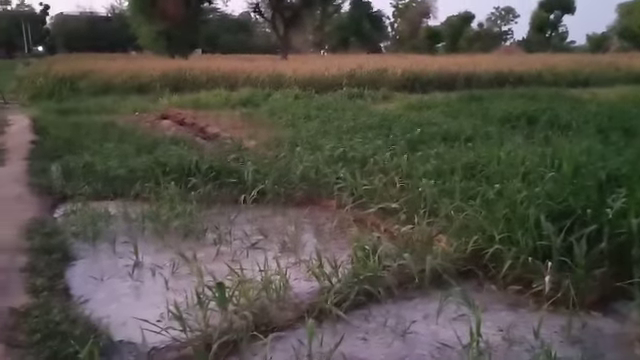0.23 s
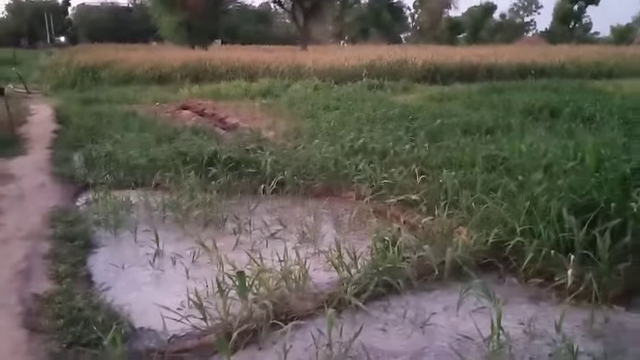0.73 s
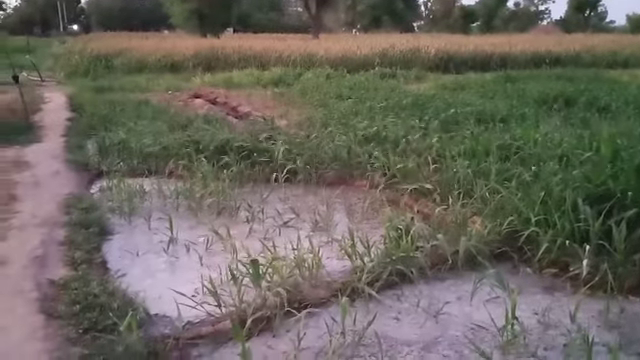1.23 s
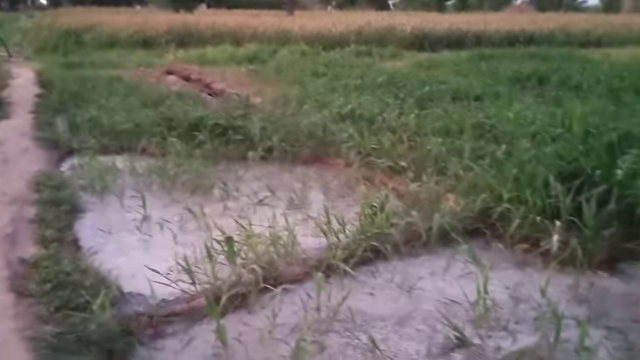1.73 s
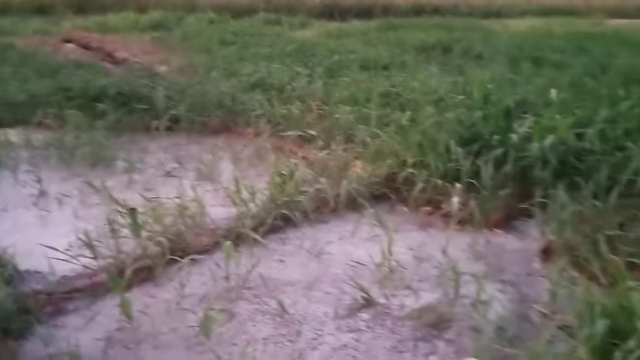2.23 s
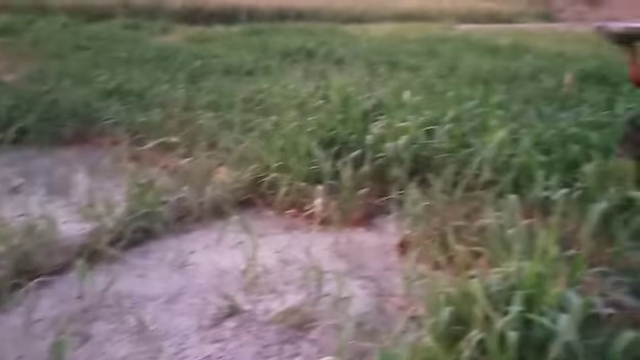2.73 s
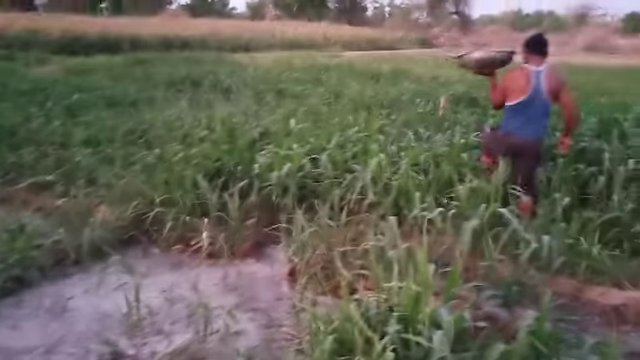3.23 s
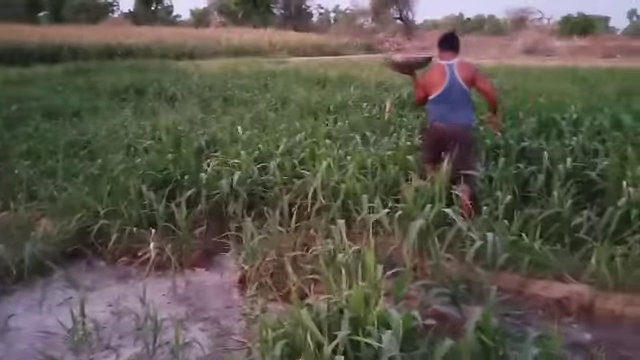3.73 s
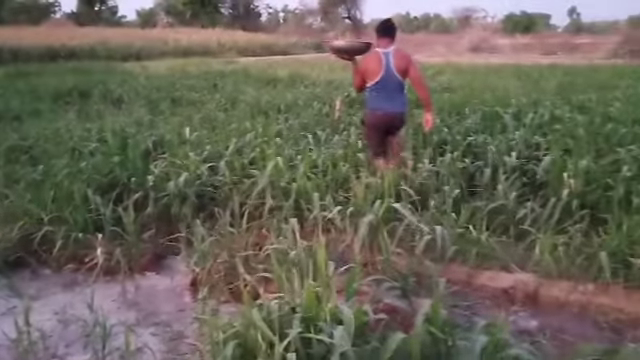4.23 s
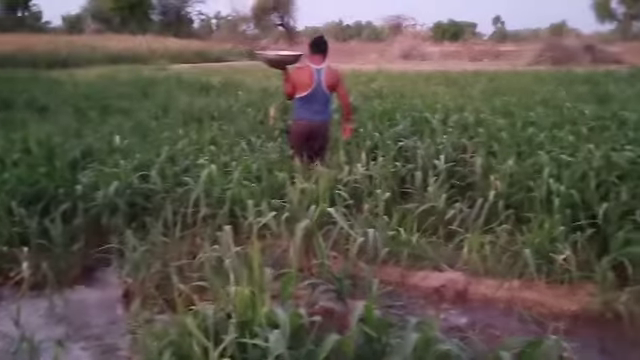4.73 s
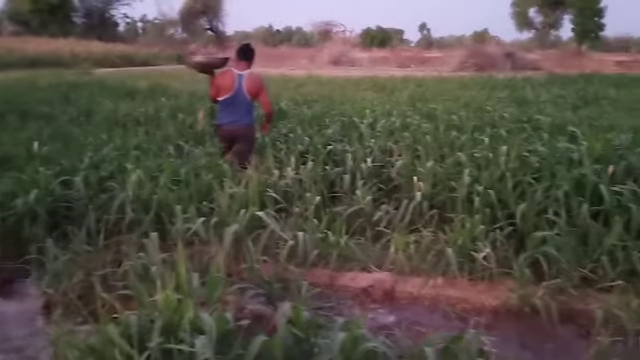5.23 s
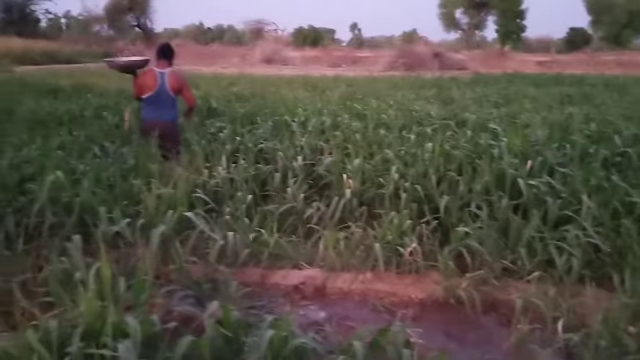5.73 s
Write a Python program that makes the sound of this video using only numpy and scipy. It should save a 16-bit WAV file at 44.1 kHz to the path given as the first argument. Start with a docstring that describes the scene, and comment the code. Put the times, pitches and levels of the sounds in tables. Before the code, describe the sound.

A lively dawn chorus and high cicada buzz fill a field while wind bumps the microphone, leaves rustle and wet footfalls pop.

```python
"""Small birds chirp over a farm field at dawn, doves coo and one far bird whistles in arcs. Cicadas drone high
above them, leaves swish, mud squelches as someone wades past, and wind buffets mostly the right port of a
stereo microphone. Bird notes are gliding sine tones with a tail of noise echoes from the trees; insects are
clicks and noise through resonances; leaves and mud are shaped noise, with short bursts for snaps and pops;
wind is short low swings of pressure over rumble, and a soft hiss lies under everything."""
import sys
import numpy as np
from scipy import signal
from scipy.fft import rfft, irfft, next_fast_len
from scipy.io import wavfile

SR = 44100
rng = np.random.default_rng(int(sys.argv[2]) if len(sys.argv) > 2 else 0)


def generate_wav(signal):
    """Clip the signal to [-1, 1] and save it as 16-bit WAV at the path in sys.argv[1]."""
    frames = np.transpose(np.atleast_2d(signal))
    scaled = np.clip(frames, -1, 1) * 32767
    pcm = np.round(scaled).astype(np.int16)
    wavfile.write(sys.argv[1], SR, pcm)


N = 263277   # length in samples

# In every table, a left-right value in dB above zero means the left is louder.
# The clearest songbird notes. Each row: start in seconds, length in seconds, pitch at the start in Hz,
# pitch in the middle in Hz, pitch at the end in Hz, level in dB.
CHIRPS = [(.035,0.032,1822,2336,2390,-40),(.046,0.078,2290,2270,1883,-32.5),(.07,.026,2566,2510,2070,-32.5),
          (.12,.155,1930,1667,1488,-50),(.223,0.057,2720,2560,2730,-46),(.261,0.034,2520,2580,2840,-37),(.299,0.01,3200,3000,2940,-35),(.299,0.042,2660,2630,2830,-36.5),
          (.408,0.012,3840,3500,3180,-49),(.415,0.025,2990,3020,3030,-38),(.455,0.024,2250,2960,3650,-43.5),(.51,0.074,2126,1906,1700,-48.5),(.534,0.027,2630,2430,1980,-42.5),(.569,0.17,2230,2372,2246,-46.5),(.575,.017,3220,2970,2920,-51),(.679,0.026,2720,2990,3050,-40.5),(.71,0.036,2290,1920,1710,-45.5),(.775,.023,2670,2745,2750,-39),
          (.795,.027,3220,3120,3000,-47),(.972,0.024,2550,2376,2260,-34.5),(1.165,0.11,2600,2607,2606,-43.5),(1.385,0.054,2280,2350,2640,-47.5),(1.435,0.11,2560,2560,2550,-44.5),(1.503,0.03,2340,2330,2340,-41),
          (1.518,.035,1910,2247,2340,-38.5),(1.541,0.054,2550,2735,2790,-37),(1.553,0.0155,1690,1683,1800,-46.5),(1.591,0.04,2940,2510,2730,-41.5),(1.593,.015,3400,3250,3500,-42.5),
          (1.654,.029,2430,2526,2700,-40.5),(1.66,.1,2180,2450,2600,-48),(1.712,0.036,2254,2095,1870,-46),(1.75,0.02,2260,2270,1830,-38),(1.768,.008,2490,2630,2460,-31.5),(1.852,0.051,3060,2910,3090,-35.5),
          (1.91,0.026,2535,2860,2920,-36.5),(1.971,0.038,3180,3085,3270,-47),(2.026,.03,2220,2240,2050,-46),(2.081,0.031,2810,2930,2770,-38),(2.113,0.067,1866,2145,2080,-45),
          (2.165,0.018,3100,3050,2980,-43),(2.17,0.012,3580,3240,3000,-47),(2.177,0.034,2650,2976,2880,-38),(2.212,.025,2330,2344,2520,-37.5),(2.226,0.049,1966,2020,1840,-38.5),(2.252,0.033,2410,2266,2050,-41),
          (2.261,0.061,2606,2440,2320,-42.5),(2.316,0.046,2834,2896,2950,-41.5),(2.435,0.053,2065,1785,1870,-42.5),(2.405,.015,3000,2720,2400,-43),(2.545,0.069,2217,2260,2270,-38.5),(2.56,0.0083,2480,2340,2560,-36),
          (2.63,.056,2030,2136,1910,-46),(2.763,0.042,2190,2270,2340,-44),(2.85,0.072,2750,2480,2470,-42.5),(2.923,0.016,2780,2770,2580,-38),(2.998,.023,2940,2990,3020,-45),
          (3.161,0.044,2630,2730,2800,-44.5),(3.262,0.016,2530,2630,2760,-33.5),(3.341,.063,2320,2358,2220,-49.5),(3.393,.071,2820,2850,2900,-47.5),
          (3.457,0.019,2050,2094,2070,-40.5),(3.515,0.041,2820,2804,2800,-43.5),(3.556,0.017,3050,3050,2930,-40),(3.57,0.008,2450,2590,2420,-32),
          (3.585,0.018,3160,3090,3000,-38),(3.593,0.0083,2760,2860,2800,-30.5),(3.614,0.084,2780,2377,2405,-36.5),(3.619,0.0423,2505,2215,2160,-41),(3.689,0.033,2755,2770,2910,-38),
          (3.701,0.019,3000,3010,3100,-33),(3.755,0.008,3120,3400,3500,-42.5),(3.782,.033,2944,2455,2160,-39),(3.815,.06,2050,1870,1770,-48),(3.808,0.012,2580,2330,2320,-43),(4.02,.11,2910,2732,2674,-43),
          (4.04,.125,1900,2137,1680,-47.5),(4.304,0.16,2360,2477,2330,-50.5),(4.325,0.035,3060,2890,2800,-42),(4.42,0.013,2820,2780,2620,-39.5),(4.423,0.058,2620,2404,2720,-42),
          (4.476,0.013,2830,2744,2690,-28.5),(4.548,0.015,2750,2835,2740,-40),(4.51,0.039,1580,1750,1710,-57.5),(4.56,0.024,1510,1610,1660,-52.5),(4.653,0.038,2400,2490,2230,-36.5),
          (4.714,0.088,2310,2600,2780,-46),(4.754,0.043,3040,3020,3280,-48),(4.836,.01,2670,2760,2790,-38.5),(4.888,.009,2130,2180,2200,-45),(4.931,0.042,2700,2610,2360,-39),(4.981,0.016,3120,2960,2970,-42.5),
          (5.04,0.0055,2570,2920,3100,-39),(5.068,0.0096,2790,2720,2500,-33),(5.091,.006,3080,3070,3270,-32),(5.091,.005,2750,2705,2906,-28.5),
          (5.114,0.022,2660,2575,2870,-31.5),(5.129,.064,2800,2970,3080,-42.5),(5.175,0.027,2730,2730,2680,-38),(5.198,.009,3250,3350,3450,-46),(5.204,0.016,2880,2920,3060,-24.5),(5.236,.03,2636,2796,3270,-34.5),
          (5.346,0.084,2580,2586,2660,-47),(5.445,.13,2350,2570,2300,-48.5),(5.55,0.017,3600,3160,2780,-46.5),(5.564,0.037,2630,2800,2910,-43),(5.677,0.021,2714,2210,1990,-36.5),(5.773,.055,2590,2970,3040,-44),
          (5.822,0.031,2897,2876,2795,-29),(5.843,.045,2590,2500,2320,-43.5),(5.875,0.077,2590,2790,3190,-38.5),(5.947,0.015,2430,2370,2580,-35),(5.956,.013,2170,2270,2020,-36)]
TREES_PAN_DB, PERCH_SPREAD_DB = 18, 8.5   # the trees lie to the left; perches scatter around that
LAG_S = .00052   # sound from the trees reaches the left port later

# The clearest dove notes. Each row: start in seconds, length in seconds, pitch in Hz, level in dB.
COOS = [(.035,0.12,519.7,-55),(0.358,0.082,560,-66),(0.658,0.087,596,-56.5),(0.893,0.11,520,-52),(1.096,.077,579,-63.5),
        (1.517,0.12,592,-58),(2.301,.15,570,-59),(2.568,0.061,556,-58.5),(3.146,0.061,527,-58.5),(3.947,0.06,508,-59.5),
        (4.029,.11,703,-58.5),(4.33,.11,566,-61),(4.354,.11,609,-56.5),(5.248,0.16,528,-59),(5.433,0.15,521,-57),
        (5.612,0.15,621,-57.5),(5.632,0.1,708,-57)]
COO_SAG = 0.022   # a coo starts this share above its pitch and ends as far below
FAR_DOVES_DB = -69.5

# Arched whistles of a far bird. Each row: start, crest and end in seconds, pitch at the crest in Hz, level in dB.
WHISTLES = [(0,.07,0.1,1395,-59),(3.45,3.51,3.59,1460,-71),(4.04,4.11,4.4,1440,-58.5),(5.25,5.455,6.7,1330,-54.5)]
SAG_HZ, FADE_DB, ARCH_S = 260, 8, .2   # pitch and level lost ARCH_S away from the crest
WHISTLE_EDGE_S, WHISTLE_PAN_DB = .04, -1.5

# The distant flock over time. Each row: time in seconds, level in dB, left-right in dB.
FLOCK = [(0,-47.5,7),(.5,-52,24),(1.2,-51.5,7),(1.75,-48,17.5),(2.6,-48.5,8.5),(3.3,-54,29),(3.9,-45,20),(4.3,-54,36),(4.75,-50.5,15),(5.2,-52,22),(5.97,-46.5,20)]
FLOCK_HZ, FLOCK_SPREAD, FLOCK_PER_S = 2480, .16, 250.0   # middle pitch, its scatter (about 16 %), notes a second

# Cicadas in the near tree, swelling and fading unevenly, mostly on the left.
# Each row: time in seconds, level in dB, left-right in dB.
NEAR_CICADAS = [(0,-37.5,37),(.9,-36.5,12),(1.25,-39,16),(1.65,-37,13),(2.2,-38.5,15),(2.9,-44,13),(3.13,-47.5,16),(3.37,-60,11),(4.09,-50.5,11),(4.5,-53.5,1),(4.8,-46.5,-5),(5.25,-63,7),(5.97,-44.5,22)]
# Resonances of the near cicadas. Each row: pitch in Hz, width in Hz, relative level in dB.
NEAR_MODES = [(6234, 1440, 1), (6595, 750, 0.5), (6880, 340, -4.5)]
# Insects all over the field. Each row: time in seconds, level of the wide drone in dB, of the thin trills in dB.
FIELD_INSECTS = [(0, -49, -42), (1.5, -51, -69), (3, -49, -44), (4, -49.5, -54.5), (5, -52, -49.5),
                 (5.97, -53.5, -62)]
# Resonances of the wide drone. Each row: pitch in Hz, width in Hz, relative level in dB.
FIELD_MODES = [(5400, 700, -1), (6200, 1000, 0), (7200, 900, -1), (8000, 1100, -5)]
# Resonances of the thin trills. Each row: pitch in Hz, width in Hz, relative level in dB.
TRILL_MODES = [(5850, 90, -2), (6330, 120, -5), (6830, 130, 0), (6990, 80, -4)]
# A very high insect buzz on the left. Each row: time in seconds, level in dB.
HIGH_BUZZ = [(0, -62), (.8, -71), (1.4, -72), (1.7, -66), (2.0, -73), (2.25, -60), (2.6, -63), (2.9, -64),
             (3.5, -78), (5.97, -103)]
# Resonances of the high buzz. Each row: pitch in Hz, width in Hz, relative level in dB.
HIGH_MODES = [(10330, 420, 7), (11280, 1200, 16), (12300, 850, -12)]

# Strokes through the leaves. Each row: time full level is reached in seconds, hold in seconds, level in dB,
# weight of the heavy stalks in dB.
SWISH = [(.61,.01,-60,-2),(0.76,.01,-57,5),(0.84,0.034,-52,1.5),(0.937,0.14,-46.5,2),(1.047,0.24,-42,0.5),(2.5,.08,-60.5,-26),(2.817,0.21,-59.5,7),
         (2.995,.27,-55,-18),(3.533,0.018,-62,3),(3.895,0.07,-54,-12),(4.038,.02,-57,-2),(4.24,0.09,-53,-3),(4.354,0.052,-54,-13),(4.86,0.023,-64,-28),(5.21,0.12,-60,-33)]
STROKE_RISE_DB_PER_S, STROKE_FALL_DB_PER_S, SWISH_PAN_DB = 180, 185, 0.5
# Leaves stirring between strokes. Each row: time in seconds, level in dB.
RUSTLE = [(0,-62.5),(1.5,-69),(1.9,-67),(2.4,-64.5),(3.7,-63.5),(4.1,-61.5),(5.0,-59),(5.97,-57.5)]
# Tone colour of the leaf blades. Each row: frequency in Hz, relative level in dB per Hz.
LEAVES = [(500, -21.5), (1000, -18), (2500, -7), (4800, -6.5), (8000, 1.5), (11000, -7), (15500, -28.5)]
# Tone colour of the heavy stalks. Each row: frequency in Hz, relative level in dB per Hz.
STALKS = [(450, -15), (800, -19.5), (1300, -1.5), (2200, 3), (4000, 5), (6000, -6)]
# Leaf snaps. Each row: start in seconds, level in dB, left-right in dB.
SNAPS = [(0.7382, -59, -3.5), (0.7662, -42, -10), (0.827, -42, -5.0), (0.925, -34, -7), (1.0111, -39, -2.5)]

# Air pockets popping as a foot sinks in wet mud. Each row: middle in seconds, level in dB, pitch in Hz, width in ms.
POPS = [(2.849, -39, 727, 4.8), (2.847, -41.5, 1790, 7.2), (2.856, -41, 2400, 2.3), (2.861, -50, 760, 7.4),
        (2.877, -56.5, 690, 15), (3.899, -41.5, 1400, 5.4), (3.908, -42, 1200, 2.5), (3.913, -43, 2280, 6),
        (3.916, -43, 1220, 4.1), (3.921, -42, 2600, 3), (3.927, -43, 1740, 11), (3.934, -43, 2400, 4),
        (3.942, -38, 2060, 1.1), (3.95, -44, 2700, 6), (3.965, -44, 1840, 4)]
# The wet squelch around each footfall. Each row: time full level is reached in seconds, level in dB.
SQUELCH = [(2.85,-52),(3.926,-44)]
SQUELCH_HOLD_S, SQUELCH_RISE_DB_PER_S, SQUELCH_FALL_DB_PER_S = 0.02, 600, 350
# Tone colour of the mud. Each row: frequency in Hz, relative level in dB per Hz.
MUD = [(500, -41), (800, -3), (1300, 5), (2500, 4), (4000, -5), (6000, -21)]

# Wind eddies on the ports. Each row: middle in seconds, level in dB, pitch in Hz, width in ms, left-right in dB.
BUFFETS = [(0.129,-28.5,74,21,-25),(0.242,-29.5,94.5,26,-23),(.359,-34.5,81,10,-34),(0.512,-35,70,31,-14),(0.599,-51,75,35,-14),(0.708,-14.5,131,6.8,-17),
           (.771,-16.5,146,6.2,-15),(.803,-20,81,11,-7),(0.835,-18.5,139,25,-15),(.885,-28.5,99,16,-5),(.955,-28,91.5,50,-15),(0.977,-16.5,117,6.9,-23),
           (1.016,-22,109,6.9,-18),(1.061,-11,119,12,-12),(1.092,-18.5,148,5.6,-19),(1.122,-9.5,144,8.1,-10.5),(1.169,-35.5,122,30,-20),
           (1.223,-29.5,116,25,-16),(1.303,-47,80.4,54,-28),(1.395,-34,82,17,-27),(1.541,-29,84,28,-20),(1.57,-27,78,11,-14),(1.673,-28.5,103,44,-24),
           (1.709,-20.5,115,7.8,-9),(1.819,-46,74,87,-25),(1.91,-53.5,75,83,-25),(2.009,-40,83,42,-30),(2.169,-19.5,113,4.7,-36),(2.27,-17,140,7.2,-31),
           (2.297,-34,96,8,-21),(2.33,-23.5,112,5.5,-17),(2.367,-29,86,13,1),(2.431,-27.5,108,8.3,-8),(2.521,-39.5,87,21,-27),
           (2.591,-47.5,80,71,-25),(3.004,-22,104,7.1,-28),(3.066,-24.5,84.5,18,7),(3.108,-29,81,23,-7),(3.356,-29.5,99,17,-17),(3.391,-32,100,24,-14),
           (3.631,-29,78,15,-22),(3.752,-37,91,14,-18),(3.794,-34.5,91,24,-22),(3.928,-12.5,113,5.9,-11.5),(3.997,-31,126,16,9),
           (4.052,-34,82,25,-7),(4.119,-24.5,103,13.5,-19),(4.168,-22.5,111,6.1,-28),(4.203,-26,89,22,-11),(4.42,-38,84,38,-22),
           (4.462,-31,80,16,-20),(4.552,-43.5,74.5,48,-22),(4.726,-39.5,87.5,51,-23),(4.776,-38.5,100,21,-25),(4.955,-52,84.5,25,-22),(5.052,-36.5,71.6,21,-28),(5.102,-28,111,5.5,-35),
           (5.14,-24.5,108,6.7,-30),(5.167,-21.5,124,5.4,-22),(5.202,-16,110,9.1,21),(5.265,-25,96,27,34),(5.341,-25,107,34,-11),
           (5.401,-18,90,12,-5),(5.442,-28,94,43,20),(5.472,-19.5,100,38,-6),(5.517,-18,94.5,4.6,-10),(5.555,-31,100,12,4),(5.617,-20.5,134,6.4,-12),
           (5.648,-32,100,18,4),(5.679,-20.5,84,12,23),(5.727,-18,113,14,27),(5.799,-24.5,118,14.5,9),(5.853,-24,84.4,19,9),(5.931,-34.5,102,23,-10)]
# Flap of a -25 dB, 100 Hz eddy; quicker and stronger eddies flap more.
FLAP_DB, FLAP_DB_PER_HZ, FLAP_GROWTH = -56.5, 0.37, 1.64
# Rumble around each eddy (relative to the eddy's level), and the steady rumble beneath.
WAKE_DB, WAKE_RISE_DB_PER_S, WAKE_FALL_DB_PER_S, CALM_DB = -16.5, 889, 258, -81
# Tone colour of the wind rumble. Each row: frequency in Hz, relative level in dB per Hz.
WIND = [(15, -56), (25, -17.5), (75, 6.5), (123, -0.5), (210, -12), (243, -22), (348, -34.5), (480, -64),
        (620, -54), (1060, -120)]

# Tone colour of still air and microphone hiss. Each row: frequency in Hz, relative level in dB per Hz.
AIR = [(18, -33), (30, 5), (88, -11), (277, -21.5), (546, -13), (1360, -29.5), (2620, -3.5), (4780, -71),
       (5740, -25), (6890, -29), (9430, -72), (11300, -42), (15500, -41)]
AIR_DB, AIR_PAN_DB = -60, 2
PORT_CUT_HZ, CUTOFF_HZ = 45, 15850   # the microphone hears little below the first or above the second


def amp(db):
    """Turn decibels into a gain."""
    return 10 ** (np.asarray(db) / 20)


def rms_one(x):
    """Scale a sound to an average strength (rms) of 1."""
    return x / np.sqrt(np.mean(x ** 2) + 1e-20)


def in_time(rows):
    """Read the columns of a time table at every sample, in straight lines between rows."""
    s, *columns = np.transpose(rows)
    return [np.interp(np.arange(N) / SR, s, column) for column in columns]


def full_rate(x):
    """Turn values given at every 20th sample into one for every sample."""
    return np.interp(np.arange(N) / 20, np.arange(len(x)), x)


def drift(rate_hz):
    """Random wandering with spread 1: noise smoothed twice, worked out at every 40th sample."""
    r = np.exp(-2 * np.pi * rate_hz * 40 / SR)
    noise = rng.standard_normal(N // 40 + 2002)
    slow = signal.lfilter([1], [1, -2 * r, r * r], noise)[2000:]   # skip the settling
    return np.interp(np.arange(N) / 40, np.arange(len(slow)), rms_one(slow))


def swells(rows, rise_db_per_s, fall_db_per_s):
    """Level in dB of each (time, hold, dB) row: a ramp up, a hold, a ramp down, at every 20th sample."""
    t = np.arange(0, N + 20, 20) / SR
    s, hold, level_db = np.transpose(rows)[:, :, None]
    rise = rise_db_per_s * np.maximum(s - t, 0)
    fall = fall_db_per_s * np.maximum(t - s - hold, 0)
    return level_db - rise - fall


def coloured(x, spectrum):
    """Shape the frequencies of a sound to a tone-colour table, at rms 1."""
    size = next_fast_len(N)
    hz, level_db = np.transpose(spectrum)
    bins_hz = np.arange(1, size // 2 + 2) * SR / size
    shape = amp(np.interp(np.log(bins_hz), np.log(hz), level_db))
    return rms_one(irfft(rfft(x, size) * shape, size)[..., :N])


def resonate(x, modes, patchy_db):
    """Side-by-side resonances, each passed twice for steep skirts and wavering on its own; rms 1."""
    out = 0
    for k, (hz, width_hz, level_db) in enumerate(modes):
        r = np.exp(-np.pi * width_hz / SR)
        b = [(1 - r * r) / 2, 0, (r * r - 1) / 2]
        a = [1, -2 * r * np.cos(2 * np.pi * hz / SR), r * r]
        ringing = rms_one(signal.lfilter(b, a, signal.lfilter(b, a, x)))
        gain = amp(level_db + patchy_db * (drift(1.04) + 0.5 * drift(14)))
        out = out + (-1) ** k * gain * ringing   # every other resonance is flipped
    return rms_one(out)


def between(x, low_hz, high_hz):
    """Keep one steep-edged band, at rms 1."""
    return rms_one(signal.sosfilt(signal.butter(4, [low_hz, high_hz], "band", fs=SR, output="sos"), x))


def burst(hz, width_ms, turn):
    """A tenth of a second holding one bell-shaped swing in its middle, as wide as given at half height."""
    t = np.arange(-.05, .05, 1 / SR)
    return np.exp(-2.8 * (t * 1000 / width_ms) ** 2) * np.sin(2 * np.pi * hz * t + turn)


def sides(pan_db):
    """Left and right gains that always share the same total power."""
    left = amp(pan_db)
    return np.array([left, np.ones_like(left)]) / np.sqrt(1 + left ** 2)


def late_left(x):
    """Delay the left channel by the extra path between the ports."""
    return np.array([np.roll(x[0], round(LAG_S * SR)), x[1]])


def add(out, sound, s):
    """Mix a short stereo sound in at time s."""
    i = max(round(s * SR), 0)
    out[:, i:i + sound.shape[1]] += sound[:, :max(N - i, 0)]


def notes(rows, edge_s, flutter_db, flutter_hz):
    """Each bird note is a sine gliding on a curve, with quick edges and a fluttering level."""
    out = np.zeros((2, N))
    for s, length, start_hz, middle_hz, end_hz, level_db, pan_db in rows:
        t = np.arange(-edge_s, length + edge_s, 1 / SR)
        u = np.clip(t / length, 0, 1)
        # a parabola through the three pitches
        hz = start_hz * (1 - u) * (1 - 2 * u) + 4 * middle_hz * u * (1 - u) + end_hz * u * (2 * u - 1)
        progress = (t + edge_s) / (length + 2 * edge_s)
        swell = np.abs(np.sin(np.pi * progress ** 0.73)) ** 0.5
        tone = swell * np.sin(2 * np.pi * np.cumsum(hz) / SR)
        add(out, np.outer(amp(level_db) * sides(pan_db), tone), s - edge_s)
    each_side = np.array([drift(flutter_hz), drift(flutter_hz)])
    return out * amp(flutter_db * (drift(flutter_hz) + 0.72 * each_side))


def random_notes(per_s, centre_hz, spread, length_s, glide):
    """Note rows for many far birds calling at random around a typical pitch and length."""
    z = np.clip(rng.standard_normal((round(per_s * N / SR), 6)), -2, 2)
    s = np.linspace(0, N / SR, len(z)) + .05 * z[:, 0]
    hz = centre_hz * np.exp(spread * z[:, 1])
    length = length_s * np.exp(0.412 * z[:, 2])
    bend = np.exp(glide * z[:, 3])
    return np.transpose([s, length, hz / bend, hz, hz * bend, 3.5 * z[:, 4], 3.0 * z[:, 5]])


def trees(x, t60, wet_db):
    """Trunks and leaves scatter sound: a noise tail, unlike in each channel, falls 60 dB in t60 seconds."""
    t = np.arange(round(.5 * SR)) / SR
    tail = rng.standard_normal((2, len(t))) * amp(-60 * t / t60) * (t > .006)
    tail = tail / np.sqrt(np.sum(tail ** 2, axis=1, keepdims=True))
    return x + amp(wet_db) * signal.fftconvolve(x, tail, axes=1)[:, :N]


def songbirds():
    """Short gliding chirps, each from a perch of its own, with a tail from the trees."""
    pan_db = TREES_PAN_DB + PERCH_SPREAD_DB * rng.standard_normal((len(CHIRPS), 1))
    chirps = notes(np.hstack([CHIRPS, pan_db]), edge_s=0.002212, flutter_db=1.94, flutter_hz=145)
    return trees(chirps, t60=0.19, wet_db=-8)


def doves():
    """Husky low notes, near and far: the pitch glides and the level flutters deeply."""
    far_rows = random_notes(45.0, 575, spread=0.0918, length_s=0.0573, glide=0.031)
    far = amp(FAR_DOVES_DB) * rms_one(notes(far_rows, edge_s=.02, flutter_db=2.6, flutter_hz=38))
    pans_db = 6.0 * rng.standard_normal(len(COOS))
    near_rows = [(s, length, hz * (1 + COO_SAG), hz, hz * (1 - COO_SAG), level_db, pan_db)
                 for (s, length, hz, level_db), pan_db in zip(COOS, pans_db)]
    near = notes(near_rows, edge_s=0.019, flutter_db=3.55, flutter_hz=51)
    return trees(near + far, t60=0.16, wet_db=-4.5)


def whistles():
    """A clean tone arches over its crest and fades away from it, slightly unsteady, with a tree tail."""
    out, t = np.zeros(N), np.arange(N) / SR
    for start, crest, end, crest_hz, level_db in WHISTLES:
        away = np.abs((np.clip(t, start, end) - crest) / ARCH_S) ** 1.5
        gate = np.clip(np.minimum(t - start, end - t) / WHISTLE_EDGE_S, 0, 1)
        tone = np.sin(2 * np.pi * np.cumsum(crest_hz - SAG_HZ * away) / SR)
        out += gate * amp(level_db - FADE_DB * away) * tone
    unsteady = out * sides(WHISTLE_PAN_DB)[:, None] * amp(1.6 * drift(30))
    return trees(unsteady, t60=.15, wet_db=-5)


def flock():
    """The far chorus: overlapping notes blurred by the trees, with thinner, higher voices above."""
    small_rows = random_notes(FLOCK_PER_S, FLOCK_HZ, FLOCK_SPREAD, length_s=.02, glide=.07)
    thin_rows = random_notes(40.0, 3900, spread=.1, length_s=.02, glide=0.063)
    small = notes(small_rows, edge_s=.004, flutter_db=3.5, flutter_hz=60)
    thin = notes(thin_rows, edge_s=.004, flutter_db=4, flutter_hz=60)
    far = rms_one(trees(small + amp(-17.0) * thin, t60=.33, wet_db=-1))
    level_db, pan_db = in_time(FLOCK)
    return amp(level_db) * sides(pan_db) * far


def tymbals(count, clicks_per_s):
    """Many insects, each clicking its membrane at its own slightly uneven rate."""
    out = np.zeros(N)
    for rate in clicks_per_s * rng.uniform(.7, 1.4, count):
        uneven = 1 + .15 * rng.standard_normal(round(rate * N / SR) + 9)
        at = np.cumsum(SR / rate * uneven).astype(int)
        at = at[at < N]
        out[at] += rng.standard_normal(len(at))
    return out


def from_one_side(spread):
    """Insect clicks that reach both ports, the left one later, with noise for scattered sound."""
    direct = rms_one(tymbals(count=30, clicks_per_s=260))
    return late_left(np.array([direct, direct])) + spread * rng.standard_normal((2, N))


def cicadas():
    """Clicks ring resonances: a loud group in one direction, a crowd over the field, a few narrow trills."""
    near = resonate(from_one_side(spread=0.84), NEAR_MODES, patchy_db=0.87)
    near = between(near, low_hz=4560, high_hz=7850)
    level_db, pan_db = in_time(NEAR_CICADAS)
    near = amp(level_db + 0.13 * drift(1)) * sides(pan_db) * near
    # swapped channels: here the right port hears the clicks later
    wide = resonate(from_one_side(spread=1.0)[::-1], FIELD_MODES, patchy_db=-1.8)
    wide = between(wide, low_hz=4770, high_hz=8550)
    trills = resonate(from_one_side(spread=1.0), TRILL_MODES, patchy_db=-1.6)
    wide_db, trill_db = in_time(FIELD_INSECTS)
    wide = amp(wide_db) * sides(-7.5)[:, None] * wide
    return near + wide + amp(trill_db) * sides(8.4)[:, None] * trills


def high_buzz():
    """A wide, faint band of resonating noise above the cicadas."""
    buzz = resonate(rng.standard_normal((2, N)), HIGH_MODES, patchy_db=-1.5)
    return amp(in_time(HIGH_BUZZ)[0]) * sides(32.0)[:, None] * buzz


def leaves():
    """Dense rubbing grains of noise swell with each stroke, and a few leaves snap."""
    strokes = amp(swells(np.array(SWISH)[:, :3], STROKE_RISE_DB_PER_S, STROKE_FALL_DB_PER_S))
    stalk_weight = amp(np.array(SWISH)[:, 3:])
    rustle = amp(in_time(RUSTLE)[0])
    blade_level = rustle + full_rate(strokes.max(axis=0))   # the strongest stroke wins
    stalk_level = rustle + full_rate((strokes * stalk_weight).max(axis=0))
    grains = rng.standard_normal((2, N)) * (1 + 2.0 * (rng.random(N) < .02) * rng.exponential(1, N))
    blades = blade_level * coloured(grains, LEAVES)
    stalks = stalk_level * coloured(rng.standard_normal((2, N)), STALKS)
    flicker = amp(1.4 * drift(12.5) + 0.92 * drift(29))
    out = (blades + stalks) * flicker * sides(SWISH_PAN_DB)[:, None]
    t = np.arange(round(.05 * SR)) / SR
    for s, level_db, pan_db in SNAPS:
        crack = np.diff(rng.standard_normal(len(t) + 1)) * amp(-60 * t / .004)   # bright, 60 dB down in 4 ms
        add(out, np.outer(amp(level_db) * sides(pan_db), crack), s)
    return out


def footfalls():
    """Air pockets pop as short swings over a squelch of crackling noise."""
    crackle = rng.standard_normal(N) * (1 + 1.0 * (rng.random(N) < .01))
    crackle = crackle + 1.15 * rng.standard_normal((2, N))
    rows = [(s, SQUELCH_HOLD_S, level_db) for s, level_db in SQUELCH]
    wet = amp(swells(rows, SQUELCH_RISE_DB_PER_S, SQUELCH_FALL_DB_PER_S))
    out = full_rate(wet.sum(axis=0)) * amp(1.8 * drift(80)) * coloured(crackle, MUD)
    for s, level_db, hz, width_ms in POPS:
        add(out, amp(level_db) * burst(hz, width_ms, np.zeros((2, 1))), s - .05)
    return out


def wind():
    """Each eddy is a short low swing of pressure with a sharper flap, in a wake of lumpy rumble."""
    out = np.zeros((2, N))
    turns = rng.uniform(0, 2 * np.pi, len(BUFFETS))
    for (s, level_db, hz, width_ms, pan_db), turn in zip(BUFFETS, turns):
        left_behind = np.array([[-.4], [0]])   # radians
        swing = amp(level_db) * sides(pan_db)[:, None] * burst(hz, width_ms, turn + left_behind)
        flap_db = FLAP_DB + FLAP_DB_PER_HZ * (hz - 100) + FLAP_GROWTH * (level_db + 25)
        flap_gain = sides(pan_db)[1] * amp(flap_db + np.array([[-16.0], [0]]))   # mostly at the right port
        add(out, swing, s - .05)
        add(out, flap_gain * burst(215.0, 4.05, turn), s - .053)   # the flap comes 3 ms earlier
    shared, own = coloured(rng.standard_normal((2, N)), WIND)
    rumble = np.array([amp(-11) * (shared + 0.45 * own), shared])   # weaker on the left
    rows = [(s, width_ms / 1000, level_db + WAKE_DB) for s, level_db, hz, width_ms, pan_db in BUFFETS]
    wakes = amp(swells(rows, WAKE_RISE_DB_PER_S, WAKE_FALL_DB_PER_S))
    rumble_level = amp(CALM_DB) + full_rate(wakes.sum(axis=0))
    return out + rumble_level * amp(3.1 * drift(29)) * rumble


def still_air():
    """A soft, slightly wavering noise for still air and microphone hiss."""
    hiss = coloured(rng.standard_normal((2, N)), AIR)
    return amp(AIR_DB + 0.5 * drift(18)) * sides(AIR_PAN_DB)[:, None] * hiss


def scene():
    """Add up all sources of the field at the two ports."""
    from_trees = late_left(songbirds() + whistles() + flock())
    insects = cicadas() + high_buzz()
    return from_trees + doves() + insects + leaves() + footfalls() + wind() + still_air()


def record(dry):
    """The microphone cuts the deepest bass gently and the top steeply."""
    thin = signal.sosfilt(signal.butter(2, PORT_CUT_HZ, "high", fs=SR, output="sos"), dry)
    return signal.sosfilt(signal.cheby2(22, 60, CUTOFF_HZ, fs=SR, output="sos"), thin)


dry = scene()
out = record(dry)
generate_wav(out)
```